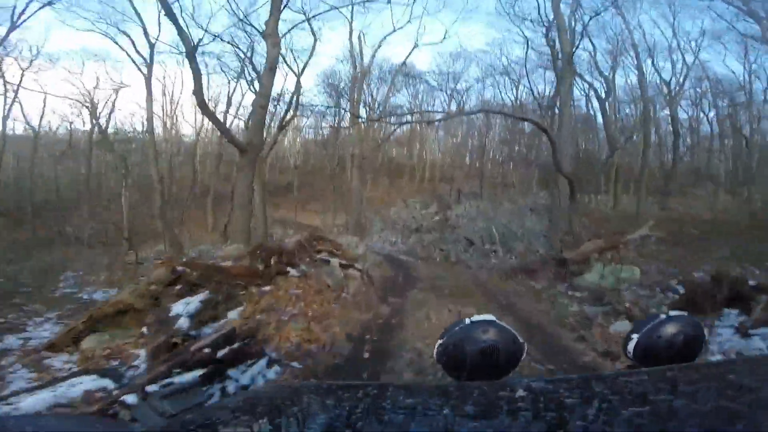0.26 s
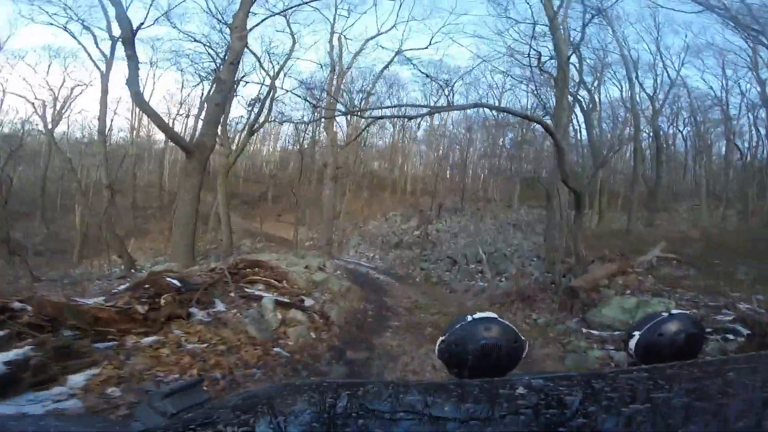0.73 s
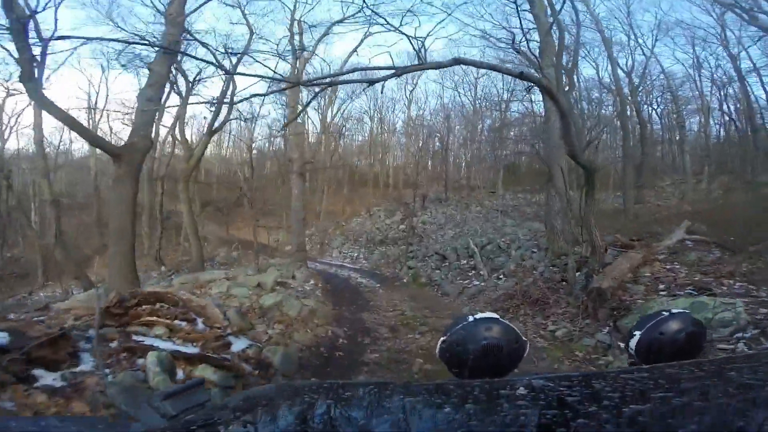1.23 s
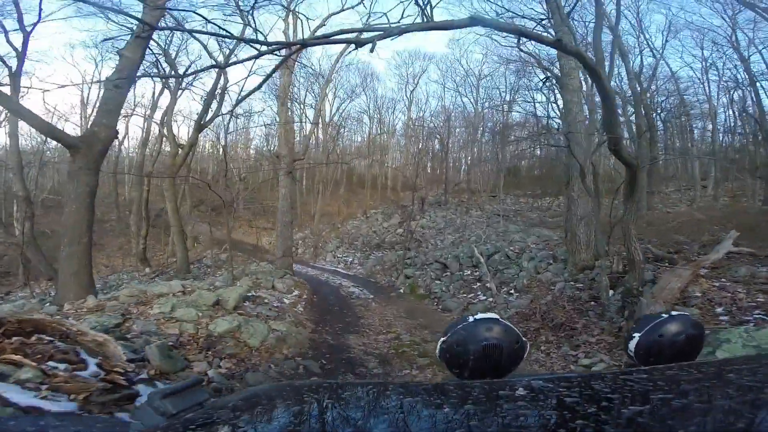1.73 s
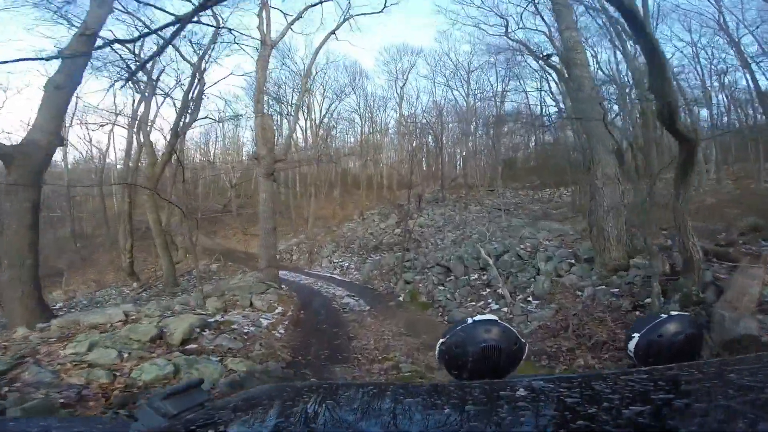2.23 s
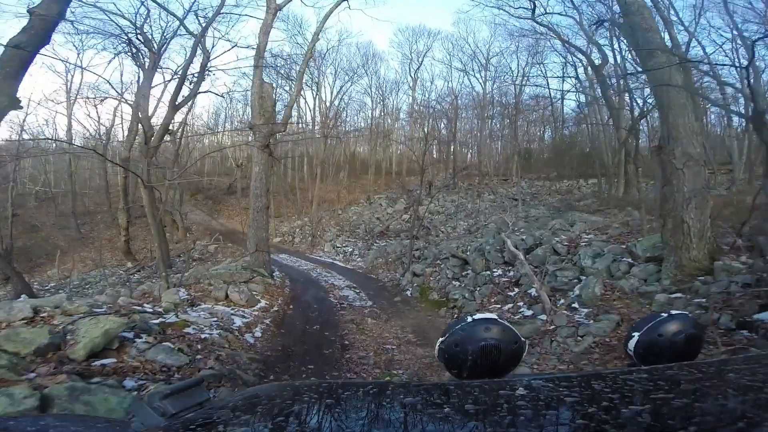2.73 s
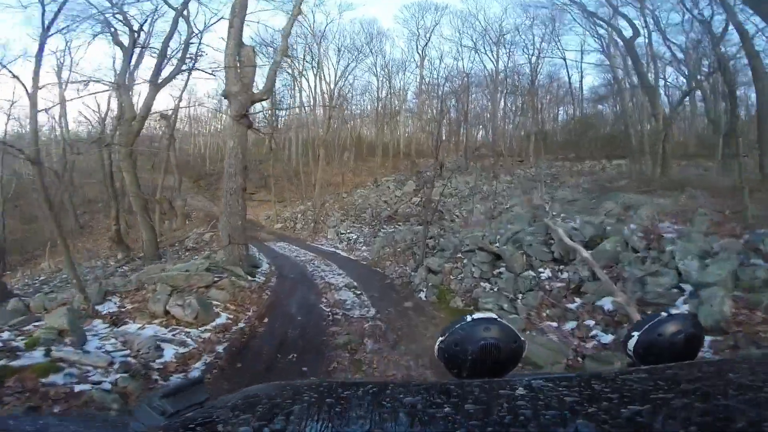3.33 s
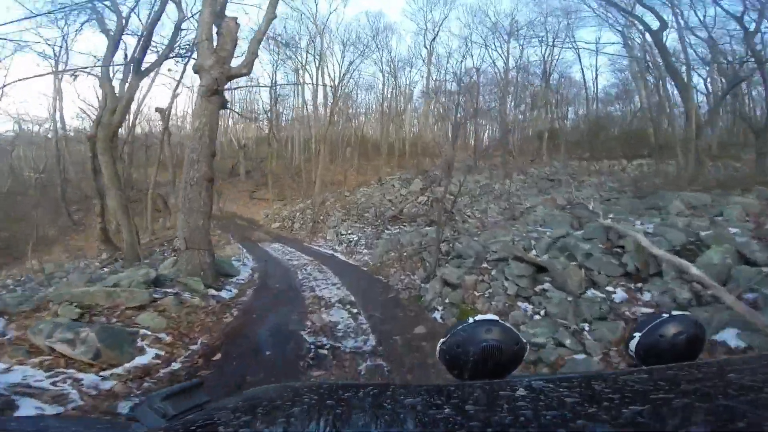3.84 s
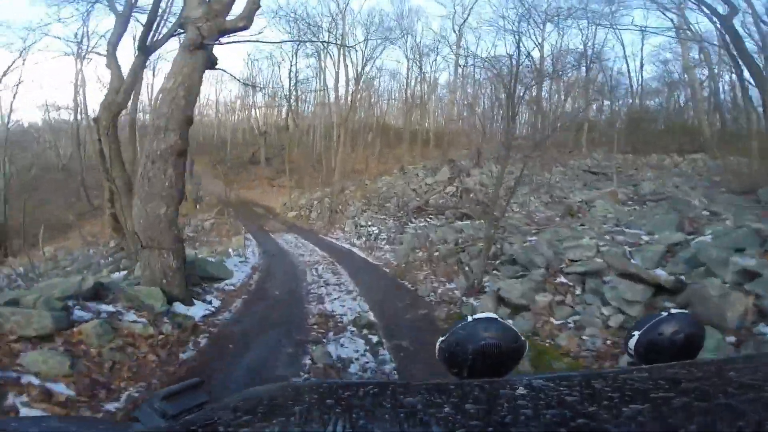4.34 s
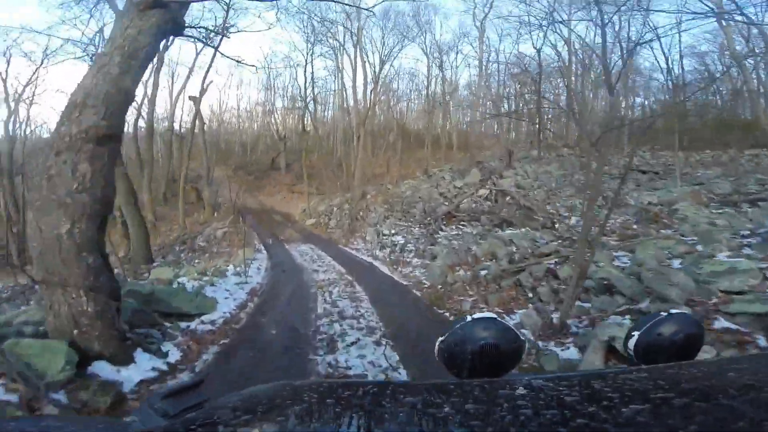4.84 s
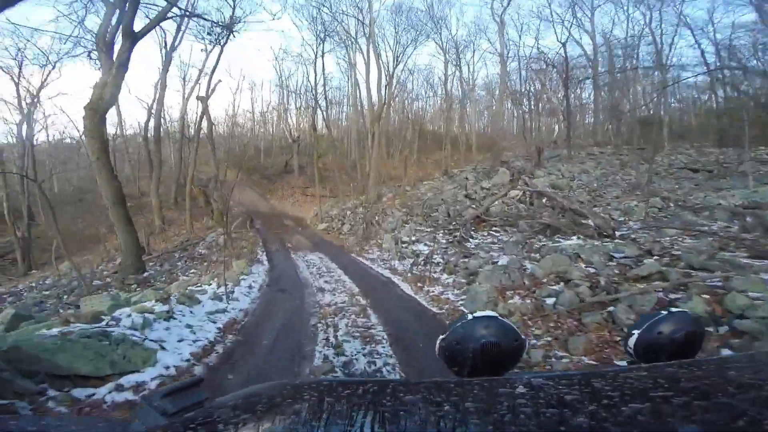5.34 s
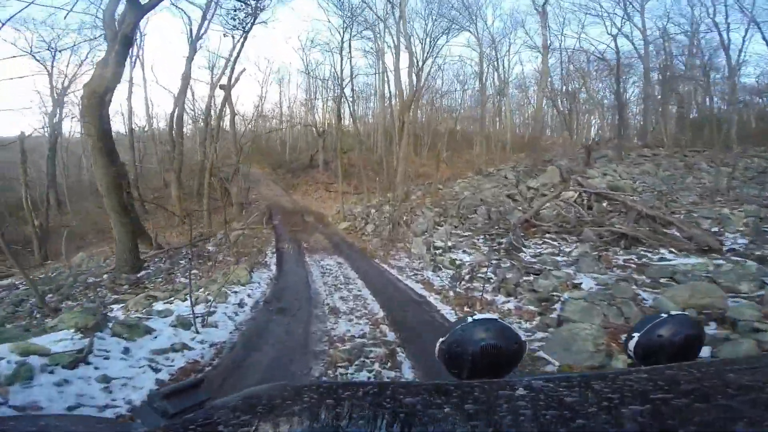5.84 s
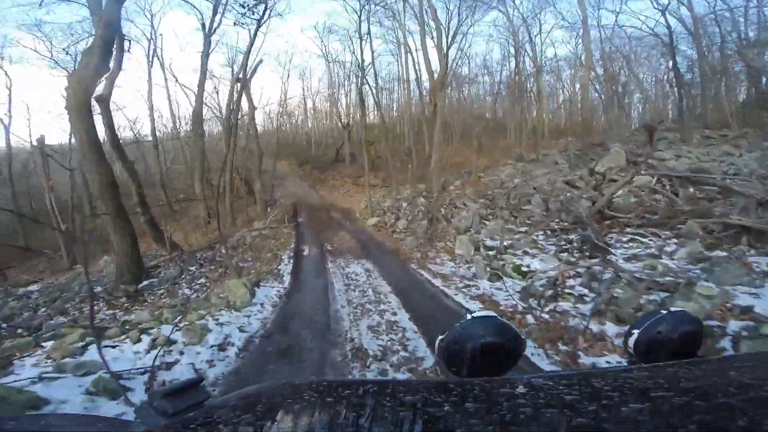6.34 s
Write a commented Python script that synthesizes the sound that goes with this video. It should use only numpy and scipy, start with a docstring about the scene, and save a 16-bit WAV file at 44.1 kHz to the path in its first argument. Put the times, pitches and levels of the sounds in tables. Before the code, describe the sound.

Mono sound from a microphone on a vehicle outdoors in bare woods, dry and close. Stones crunch against the floor pan and a loose metal part clatters at once; a twig scratches briefly. The engine swells smoothly and low, then drops to idle. Regular clicks return, with a cluster of hollow thuds near the end, over constant rumble, tyre roar and faint hiss.

```python
"""The four-cylinder engine of an off-road car idles, pulls briefly and drops back on a stony forest track.
Its firing orders are near sines weighted by exhaust resonance; noise through panel modes makes its clatter.
At idle a loose part rattles about once per crank turn: clicks with gritty tails excite its modes.
Coloured noise makes the body's shake, roar and hiss; stones ring the floor pan with noisy contact forces.
Damped sines thud off rocks, crackling noise is twigs on panels, and wavering tones are squeaking joints."""
import sys
import numpy as np
from scipy import signal
from scipy.fft import rfft, irfft
from scipy.io import wavfile

SR = 44100
rng = np.random.default_rng(int(sys.argv[2]) if len(sys.argv) > 2 else 0)


def pcm_store(signal):
    """Save signal as 16-bit PCM."""
    levels = np.round(np.clip(np.atleast_2d(signal), -1, 1) * 32767)
    wavfile.write(sys.argv[1], SR, levels.astype(np.int16).T)


N = 290178


def from_db(db):
    """Amplitude ratio from its logarithmic level in decibels."""
    return 10 ** (np.asarray(db) / 20)


def rms_one(x):
    """Normalise to unit mean-square power."""
    return x / np.sqrt(np.mean(x ** 2) + 1e-20)


def in_time(rows):
    """Linear interpolation of each column to one value per sample."""
    s, *columns = np.transpose(rows)
    return [np.interp(np.arange(N) / SR, s, column) for column in columns]


def at_hz(points, hz):
    """Interpolation of a spectrum in dB along a logarithmic frequency axis."""
    points_hz, points_db = np.array(points).T
    return np.interp(np.log(hz), np.log(points_hz), points_db)


def drift(rate_hz):
    """Slow random fluctuation of spread 1: white noise through two equal one-pole low-passes."""
    step = 40   # samples between the coarse values
    pole = np.exp(-2 * np.pi * rate_hz * step / SR)
    coarse = rng.standard_normal(N // step + 2002)
    slow = signal.lfilter([1], [1, -2 * pole, pole ** 2], coarse)[2000:]   # without the settling time
    return np.interp(np.arange(N) / step, np.arange(len(slow)), rms_one(slow))


def resonate(x, hz, width_hz):
    """Damped mode as a two-pole resonance with unit gain at its peak."""
    r = np.exp(-np.pi * width_hz / SR)
    zeros = np.array([1, 0, -1]) * (1 - r * r) / 2
    return signal.lfilter(zeros, [1, -2 * r * np.cos(2 * np.pi * hz / SR), r * r], x)


def patchy_noise(spectrum, shared_db, own_db, rate_hz):
    """Spectral shaping of noise, in half-octave bands that flicker partly together, partly alone; rms 1."""
    hz = np.arange(N // 2 + 1) * SR / N + 1e-3
    shaped = rfft(rng.standard_normal(N)) * from_db(at_hz(spectrum, hz))
    half_octaves = 2 * np.log2(hz)
    lowest, highest = 2 * np.log2(spectrum[0][0]), 2 * np.log2(spectrum[-1][0])
    out, together = 0, drift(rate_hz)
    for centre in np.arange(lowest, highest + 1):
        # overlapping bands sum to one
        window = np.cos(np.pi / 2 * np.clip(half_octaves - centre, -1, 1)) ** 2
        flicker_db = shared_db * together + own_db * drift(rate_hz)
        out = out + irfft(shaped * window, N) * from_db(flicker_db)
    return rms_one(out)


def exhaust(firing_hz, load_db):
    """Harmonic source and resonator: each firing order is as loud as the pipe lets its pitch out."""
    # Exhaust response, booming where the pipe resonates. Each row: frequency in Hz, gain in dB.
    pipe = [(25, -31), (60, -11), (86, -17.5), (102, -6.5), (118, 4), (130, -4), (143, -19.5), (165, -24.5),
            (179, -12.5), (205, -27), (235, -20), (260, -19.5), (292, -11.5), (335, -33), (360, -18.5),
            (450, -45.5), (800, -35)]
    brass_db_per_octave = 20   # upper orders grow with engine speed
    firing_phase = 2 * np.pi * np.cumsum(firing_hz * (1 + 0.0023 * drift(8.3))) / SR
    out = np.zeros(N)
    for order in range(1, 13):
        pipe_db = at_hz(pipe, order * firing_hz)
        brass_db = (order > 3) * brass_db_per_octave * np.log2(firing_hz / 59)
        flutter_db = 0.82 * np.sqrt(order) * drift(8.3)
        gain = np.sqrt(2) * from_db(load_db + pipe_db + brass_db + flutter_db)
        out += gain * np.sin(order * firing_phase + rng.uniform(0, 2 * np.pi))
    return out, firing_phase


def engine_bay(firing_phase, firing_hz, roar_swing_db):
    """Forced vibration: valve-gear clatter pulses a little with the firings and rings in two panels."""
    # Spectrum of the clatter. Each row: frequency in Hz, density in dB per Hz.
    clatter = [(1000, 10), (1250, 1.5), (1420, -2), (1640, -2.5), (2100, -3.5), (2400, -7.5), (2750, -5.5),
               (3600, -11.5), (5100, -18), (5700, -25.5), (7000, -36)]
    # Panel resonances. Each row: frequency in Hz, width in Hz, level in dB.
    panels = [(1660, 60, -15), (2340, 110, -14)]
    base_db, roar_share = -47, 0.83   # level at mean roar and idle; share of the roar's swing
    idle_hz, db_per_octave = 32, 2.5   # firings per second at idle; rise with engine speed
    level_db = base_db + roar_share * roar_swing_db + db_per_octave * np.log2(firing_hz / idle_hz)
    noise = patchy_noise(clatter, shared_db=0.55, own_db=1.23, rate_hz=29)
    noise = noise * from_db(1.4 * np.sin(firing_phase))
    rung = sum(from_db(db) * rms_one(resonate(noise, hz, width)) for hz, width, db in panels)
    return from_db(level_db) * (noise + rung)


def chassis_shake(shake_db):
    """Random vibration: low noise whose level follows the ride."""
    # Spectrum of the shake. Each row: frequency in Hz, density in dB per Hz.
    spectrum = [(12, -1), (25, 0), (36, 2), (60, -6.5), (90, -7), (125, -6), (180, -19.5), (260, -18.5),
                (400, -38)]
    return from_db(shake_db) * patchy_noise(spectrum, shared_db=2.0, own_db=2.0, rate_hz=7.4)


def tyre_roar(roar_db):
    """Broadband excitation: tyre and body noise coloured by a fixed spectrum."""
    # Spectrum of the roar. Each row: frequency in Hz, density in dB per Hz.
    spectrum = [(88, -23.5), (150, 2.5), (199, -0.5), (337, -4), (446, -2), (691, -6.5), (757, -5),
                (980, -10.5), (1360, -34), (1640, -56), (4840, -120)]
    return from_db(roar_db) * patchy_noise(spectrum, shared_db=1.5, own_db=1.5, rate_hz=17.4)


def treble_hiss(roar_swing_db):
    """Amplitude modulation: high noise partly follows the roar and swells once."""
    # Spectrum of the hiss. Each row: frequency in Hz, density in dB per Hz.
    spectrum = [(4000, -4), (5800, -8.5), (8200, -9.5), (9000, -17.5), (10500, -16), (11600, -15.5),
                (12600, -21.5), (15500, -40)]
    base_db, roar_share = -64, 0.81   # level at mean roar; share of the roar's swing
    swell_s, swell_width_s, swell_db = 5.86, 0.19, 4
    swell = np.exp(-((np.arange(N) / SR - swell_s) / swell_width_s) ** 2)
    level_db = base_db + roar_share * roar_swing_db + swell_db * swell
    return from_db(level_db) * patchy_noise(spectrum, shared_db=1.5, own_db=-0.1, rate_hz=37)


def rattle(scratch_s=0.0014, buzz_s=0.0072, buzz_db=-26):
    """Impact excitation of modes: edge contacts favour the high ones, flat contacts the low ones."""
    # Taps of the loose part, often rebounding.
    # Each row: time in seconds, tap level in dB, edge contact from 0 (flat) to 1 (edge).
    taps = [(0.031, -24.0, 0.6), (0.0348, -19, 0.4), (0.0892, -14.5, 0.64), (0.1087, -23, 0.13),
            (0.1426, -29, 0), (0.1496, -25, 0.5), (0.152, -19, 0.4), (0.1765, -26, 0.1),
            (0.1946, -21.0, 0.0), (0.1996, -24, 0.0), (0.2087, -25, 0.5), (0.2126, -23.5, 0.5),
            (0.2535, -27, 0.0), (0.258, -30, 0.0), (0.2724, -24, 0.57), (0.2964, -19, 0.4),
            (0.3094, -14.5, 0.1), (0.3242, -23, 0), (0.3344, -18.5, 0.7), (0.3614, -23, 0.3),
            (0.3665, -18.5, 0), (0.392, -18, 0.6), (0.3954, -16.5, 0.27), (0.4229, -30, 0.5),
            (0.4553, -15, 0.4), (0.5175, -9, 0.83), (0.523, -20.5, 0.1), (0.5812, -10, 0.69),
            (0.587, -28, 0), (0.608, -31, 0.2), (0.6385, -16.5, 0.1), (0.6439, -21, 0.5), (0.669, -25, 0.8),
            (0.6939, -22.5, 0.37), (0.71, -28.5, 0.44), (0.8399, -22.5, 0.4), (0.8438, -25, 0.34),
            (0.8808, -26.5, 0.0), (0.969, -32, 0.6), (0.9925, -22, 0.3), (1.1138, -37, 0.85),
            (1.1764, -30, 0.4), (1.1854, -32, 0.0), (1.2255, -26.5, 0.3), (1.2818, -29, 0.52),
            (1.3404, -26.5, 0.9), (1.3982, -26.5, 1), (2.3063, -30.5, 0.36), (2.622, -31, 0.45),
            (2.6865, -36.0, 0.81), (3.3553, -30, 0.49), (3.4109, -25, 0.62), (3.414, -17.5, 0.11),
            (3.4765, -18.5, 0.4), (3.479, -21, 0.34), (3.5359, -24.5, 0.65), (3.54, -24, 0.34),
            (3.5958, -24.5, 0.69), (3.6003, -22.5, 0), (3.6489, -27, 0.9), (3.6559, -32, 0.37),
            (3.6743, -30, 0.03), (3.7099, -23, 0.7), (3.7146, -29, 0.2), (3.7707, -24, 0.17),
            (3.7734, -25.5, 0.5), (3.8289, -27, 0.69), (3.8334, -26.5, 0.37), (3.8861, -21, 0.35),
            (3.889, -23, 0.8), (3.9504, -24, 0.45), (3.9528, -22, 0.3), (4.0127, -23, 1),
            (4.0183, -25, 0.3), (4.0683, -26, 0.6), (4.0949, -24, 0), (4.1255, -24, 0.73),
            (4.1503, -26, 0.33), (4.177, -23.5, 0.0), (4.1823, -24, 0.63), (4.1884, -30, 0.4),
            (4.2115, -22.5, 0.02), (4.2377, -26, 0.06), (4.253, -19, 0.3), (4.257, -25, 0),
            (4.2732, -20, 0.14), (4.3161, -20, 0.15), (4.3381, -21, 0.33), (4.3807, -26, 0.1),
            (4.397, -32, 0.2), (4.4045, -29.5, 0.07), (4.4404, -13.5, 0.3), (4.4427, -29, 0),
            (4.458, -26, 0.3), (4.463, -25, 0.1), (4.5019, -26.5, 0.1), (4.5183, -15.5, 0.64),
            (4.573, -24.5, 0.9), (4.5775, -23.5, 0.22), (4.6321, -25, 0.76), (4.6612, -30, 0.03),
            (4.6891, -28.5, 0.73), (4.7497, -29, 0.76), (4.756, -24.5, 0.37), (4.7794, -20, 0.01),
            (4.8224, -20, 0.2), (4.8362, -22, 0.06), (5.396, -31.5, 0.0), (5.4304, -26.5, 1),
            (5.4953, -26, 1), (5.5018, -34, 0.35), (5.5607, -32, 0.65), (5.5684, -27, 0.2),
            (5.7561, -30, 0.53), (5.9529, -29.0, 0.54), (6.0133, -28.5, 0.66), (6.0728, -27.5, 0.8),
            (6.133, -28.5, 0.65), (6.1902, -31, 0.6), (6.2361, -30, 0.25), (6.2472, -16, 0.9),
            (6.306, -13.5, 0.55), (6.3635, -21.5, 0.46), (6.367, -23, 0), (6.4228, -23, 0.66),
            (6.4275, -24.5, 0.3), (6.4852, -26, 0.8), (6.4926, -32.5, 0.55), (6.549, -33, 0.8)]
    # Resonances of the part. Each row: frequency in Hz, width in Hz, level in dB.
    part_modes = [(2110, 1200, -7), (2890, 384, -1), (3560, 390, -3.5), (4415, 910, -4), (4776, 594, -1.5),
                  (5630, 860, -7.5)]
    tilt_db_per_octave, pivot_hz = 39.5, 3710   # colour change from flat to edge contact
    stray_share = 0.6   # share of taps followed by a faint stray touch
    ring_db, crack_db, crack_growth = 14.5, -7, 1.71   # mode gain, crack gain, crack dB per tap dB
    s, tap_db, edge = np.transpose(taps)
    luck = rng.random((len(s), 3))
    tap_at = (s * SR).astype(int)
    stray_at = ((s + 0.008 + 0.04 * luck[:, 0]) * SR).astype(int)
    stray_gain = from_db(-49 + 8 * luck[:, 2]) * (luck[:, 1] < stray_share)
    grit = 0.42 * rng.choice([-1, 1], N)   # scratch strength behind the click

    def tail(clicks, decay_s):
        """Exponential decay after each click, from the next sample on."""
        return signal.lfilter([0, 1], [1, -np.exp(-1 / (decay_s * SR))], clicks)

    def contacts(gain, stray):
        """Impulse and friction: each click drags a gritty tail."""
        clicks = np.full(N + SR, 1e-18)
        clicks[stray_at] = stray
        clicks[tap_at] = gain
        clicks = clicks[:N]
        buzz = from_db(buzz_db) * tail(clicks, buzz_s)   # the part goes on jiggling
        return clicks + grit * (tail(clicks, scratch_s) + buzz)

    ringing = 0
    for k, (hz, width, db) in enumerate(part_modes):
        colour_db = tilt_db_per_octave * (edge - 0.5) * np.log2(hz / pivot_hz)
        force = contacts(from_db(tap_db + np.minimum(colour_db, 0)), stray_gain)
        ringing = ringing + (-1) ** k * from_db(db) * resonate(force, hz, width)
    band = signal.butter(3, [1800, 7000], "band", fs=SR, output="sos")
    body = from_db(ring_db) * signal.sosfilt(band, ringing)
    # hard blows crack: treble grows faster than level
    crack = contacts(from_db(crack_growth * tap_db + crack_db), 0)
    return body + resonate(crack, 7500, 2000) + from_db(-9.0) * resonate(crack, 11400, 1500)


def knocks(spread_octaves=0.57, least_db=-38, crunch_db=-23):
    """Modal excitation: a crumbling contact, hardest at first, rings pan modes most near its favoured pitch."""
    # Stones crunching against the floor pan.
    # Each row: time in seconds, level in dB, favoured pitch in Hz, contact time in seconds.
    stones = [(0.044, -11.5, 610, 0.0098), (0.114, -9, 840, 0.014), (0.192, -9.5, 450, 0.013),
              (0.232, -15.5, 800, 0.021), (0.248, -16, 640, 0.03), (0.352, -11.5, 700, 0.011),
              (0.784, -6, 613, 0.0088), (0.793, -9, 303, 0.013), (0.803, -12, 530, 0.022),
              (0.786, -19.5, 1950, 0.019), (0.927, -13, 458, 0.0065), (1.626, -18.5, 850, 0.015),
              (1.936, -19, 550, 0.015), (2.814, -15, 412, 0.0099), (3.877, -22, 388, 0.0085),
              (5.386, -18, 631, 0.029), (5.519, -21.5, 833, 0.012), (5.672, -17.5, 339, 0.008),
              (5.855, -18, 740, 0.017), (6.087, -17.5, 529, 0.014)]
    # Floor-pan modes. Each row: frequency in Hz, time to decay by 60 dB in seconds.
    pan_modes = [(180, 0.031), (260, 0.011), (340, 0.082), (450, 0.029), (550, 0.031), (650, 0.044),
                 (780, 0.033), (900, 0.084), (1030, 0.039), (2000, 0.047)]
    pan_ring_db = 12   # contact force into the floor pan
    skirt_widening = 4.7   # damping of the pan's mountings: a second, wider pass through each mode
    modes_hz, t60_s = np.array(pan_modes).T
    widths_hz = np.log(1000) / (np.pi * t60_s)
    force = np.zeros((len(modes_hz), N))
    for s, db, favoured_hz, contact_s in stones:
        octaves = np.log2(modes_hz[:, None] / favoured_hz)
        share_db = np.maximum(-6 * (octaves / spread_octaves) ** 2, least_db)
        start, size = int(s * SR), int(contact_s * SR)
        force[:, start:start + size] += from_db(db + share_db) * np.exp(-1.5 * np.arange(size) / size)
    grit = force * rng.standard_normal(force.shape) + 1e-18
    rung = 0
    for mode_force, hz, width in zip(grit, modes_hz, widths_hz):
        rung = rung + resonate(resonate(mode_force, hz, width), hz, skirt_widening * width)
    low_pass = signal.butter(4, 2400, fs=SR, output="sos")
    pan = from_db(pan_ring_db) * signal.sosfilt(low_pass, rung)
    # the stone itself crumbles, broad and dry
    crunch = resonate(resonate(grit.sum(axis=0), 1900, 1740), 1900, 2800)
    return from_db(crunch_db) * crunch + pan


def jolts(cycles=1.44):
    """Damped free oscillation: the chassis swings a few cycles after each drop."""
    # Wheels dropping off rocks. Each row: time in seconds, level in dB, pitch in Hz.
    drops = [(0.066, -7.5, 37), (0.176, -11.5, 109), (3.973, -10.5, 43.35), (4.074, -14, 50),
             (4.71, -10, 35), (5.03, -22, 109.8), (5.095, -14, 211), (5.305, -16, 199.8), (5.203, -12, 124),
             (5.37, -13.5, 186), (5.233, -10, 46.2), (5.44, -14, 33), (5.51, -13.5, 32.8), (5.494, -9, 158),
             (5.592, -9, 181.7), (6.448, -13, 35.07)]
    out, t = np.zeros(N + SR), np.arange(SR // 3) / SR
    for s, db, hz in drops:
        envelope = np.exp(-t * hz / cycles) * (1 - np.exp(-t * hz * 4))
        start = int(s * SR)
        out[start:start + len(t)] += from_db(db) * np.sin(2 * np.pi * hz * t) * envelope
    return out[:N]


def scrapes():
    """Friction noise: a bright crackle sounds while a twig drags."""
    # Twigs dragged along the panels. Each row: start in seconds, length in seconds, level in dB.
    twigs = [(0.228, 0.036, -37.5), (0.253, 0.07, -41.5), (1.747, 0.028, -55)]
    # Spectrum of the scrape. Each row: frequency in Hz, density in dB per Hz.
    spectrum = [(1200, -14), (2400, -12.5), (3000, -10), (4500, -21), (9000, -29.5), (12500, -37),
                (15000, -43)]
    gate = np.zeros(N)
    for s, length_s, db in twigs:
        start, size = int(s * SR), int(length_s * SR)
        gate[start:start + size] = from_db(db) * signal.windows.tukey(size, 0.6)
    return gate * patchy_noise(spectrum, shared_db=4, own_db=2.5, rate_hz=150)


def squeaks():
    """Stick-slip oscillation: tones with overtones waver in pitch and throb as the joint shakes."""
    # Squeaking joints. Each row: start in seconds, length in seconds, pitch in Hz, level in dB,
    # second harmonic in dB relative to the fundamental.
    joints = [(0.256, 0.0051, 2480, -32, -25), (0.768, 0.011, 2450, -48, -30), (0.915, 0.17, 2390, -58, -5),
              (.962, .025, 2370, -55, 3), (1.105, 0.03, 2780, -50.5, -12), (3.286, 0.039, 3660, -48, -14),
              (4.292, 0.011, 2500, -48, -30), (4.357, 0.025, 3500, -46.5, -25),
              (5.05, 0.033, 2690, -50, -18)]
    throb_db = 7   # greatest level swing either way
    out, waver, throb = np.zeros(N), np.tanh(drift(250)), np.tanh(drift(90))
    for s, length_s, hz, db, over_db in joints:
        span = slice(int(s * SR), int((s + length_s) * SR))
        phase = 2 * np.pi * np.cumsum(hz * (1 + 0.018 * waver[span])) / SR
        overtones = np.sin(2 * phase) + from_db(-10) * np.sin(3 * phase)
        tone = np.sin(phase) + from_db(over_db) * overtones
        gain = from_db(db + throb_db * throb[span])
        out[span] += gain * tone * signal.windows.tukey(len(phase), 0.5)
    return out


def scene():
    """Superposition: all the sources add at one microphone."""
    # Course of the engine. Each row: time in seconds, firings per second, load level in dB.
    engine = [(0, 32.8, -18.5), (.35, 32.4, -47), (1.05, 32.4, -28.5), (1.3, 34.6, -34), (1.5, 35, -30),
              (1.6, 42.8, -24), (1.75, 45.6, -17), (1.9, 54.3, -23), (2.04, 55.7, -21), (2.28, 58.7, -18.5),
              (2.57, 59.4, -19.5), (2.82, 60.3, -20.5), (3.07, 57.2, -23), (3.15, 56, -41),
              (3.32, 37, -34.5), (4, 31.4, -28), (4.5, 36, -44), (5.45, 31, -37), (6.58, 28.2, -38)]
    # Course of the ride. Each row: time in seconds, chassis shake in dB, tyre and body roar in dB.
    ride = [(0, -19.5, -25), (.31, -28, -28), (.99, -23.5, -31), (1.48, -31, -33), (2.66, -29, -30),
            (3.39, -27.5, -33), (4.03, -20, -31), (4.4, -25, -33), (5.57, -22, -31), (5.75, -24.5, -30.5),
            (6.17, -25.5, -30.5), (6.58, -24.5, -29.5)]
    firing_hz, load_db = in_time(engine)
    shake_db, roar_db = in_time(ride)
    roar_swing_db = roar_db - roar_db.mean()
    boom, firing_phase = exhaust(firing_hz, load_db)
    clatter = engine_bay(firing_phase, firing_hz, roar_swing_db)
    ground = chassis_shake(shake_db) + tyre_roar(roar_db) + treble_hiss(roar_swing_db)
    contact_sounds = rattle() + knocks() + jolts() + scrapes() + squeaks()
    return (boom + clatter + ground + contact_sounds)[None]


def record(dry):
    """Low-pass filtering: the top is cut, 70 dB down from 15.5 kHz upward."""
    return signal.sosfilt(signal.cheby2(12, 70, 15500, fs=SR, output="sos"), dry)


dry = scene()
out = record(dry)
pcm_store(out)
```